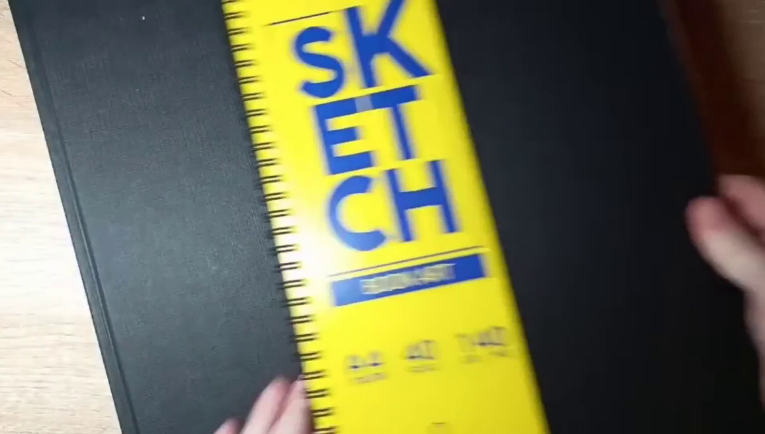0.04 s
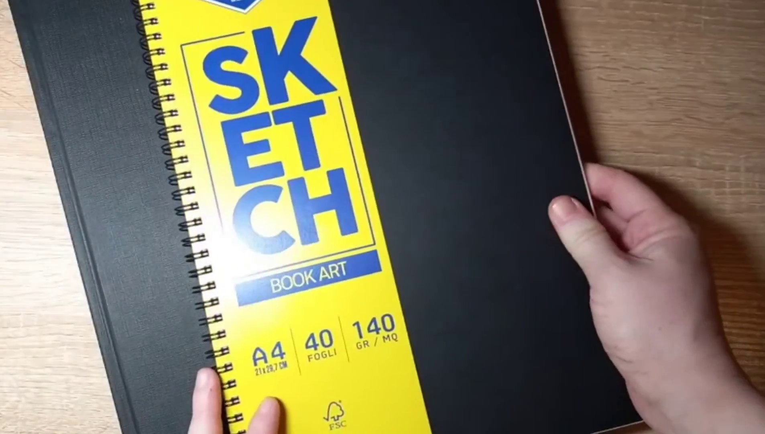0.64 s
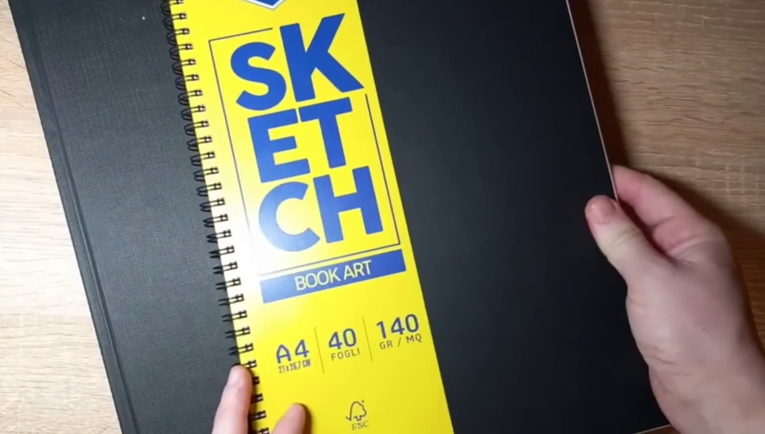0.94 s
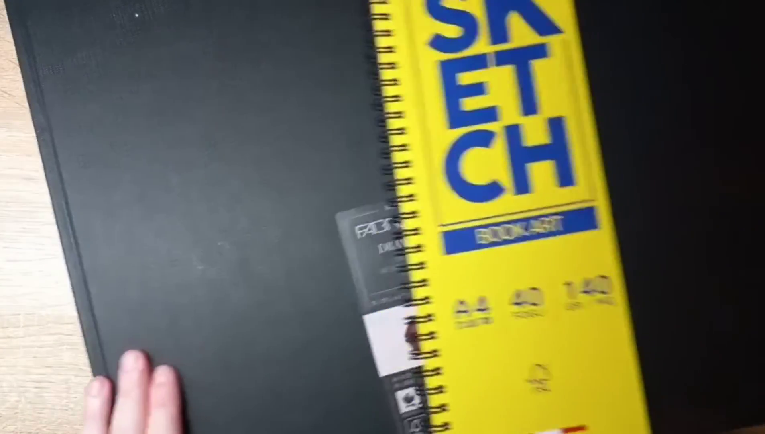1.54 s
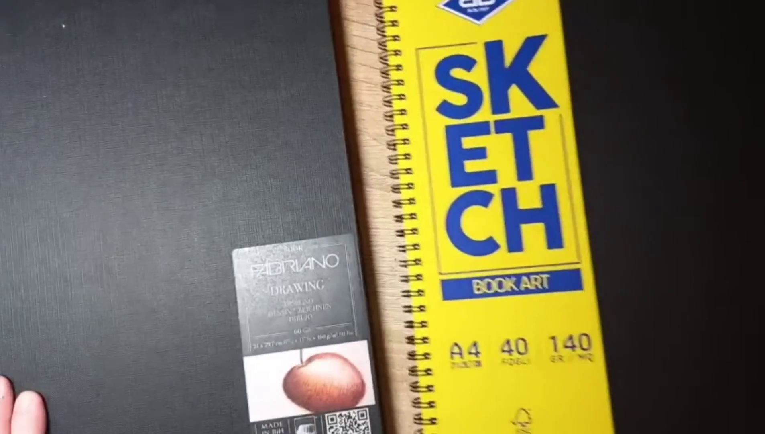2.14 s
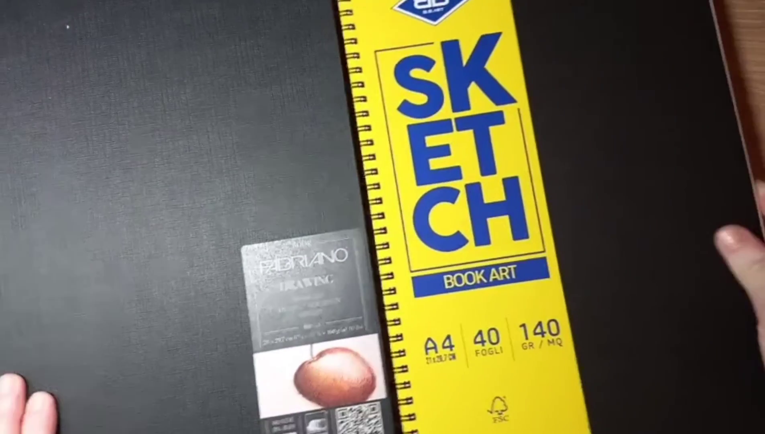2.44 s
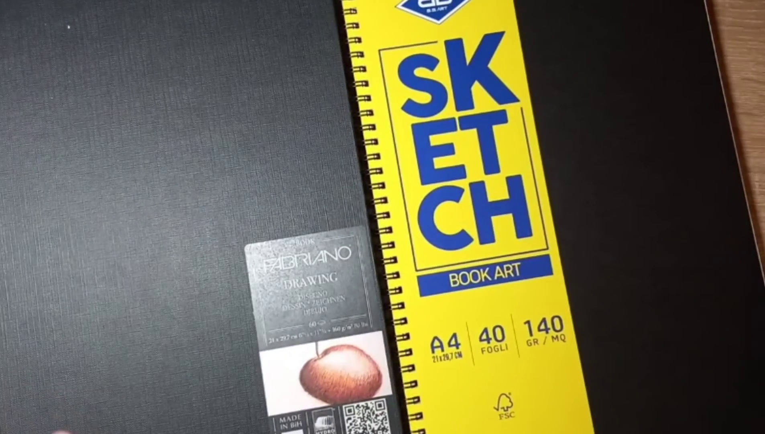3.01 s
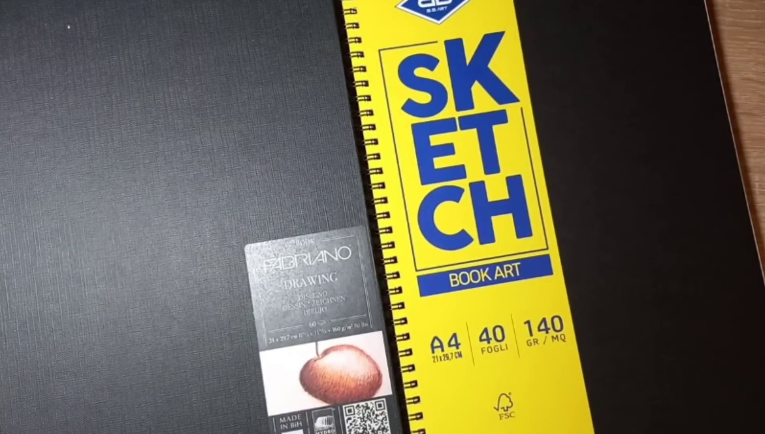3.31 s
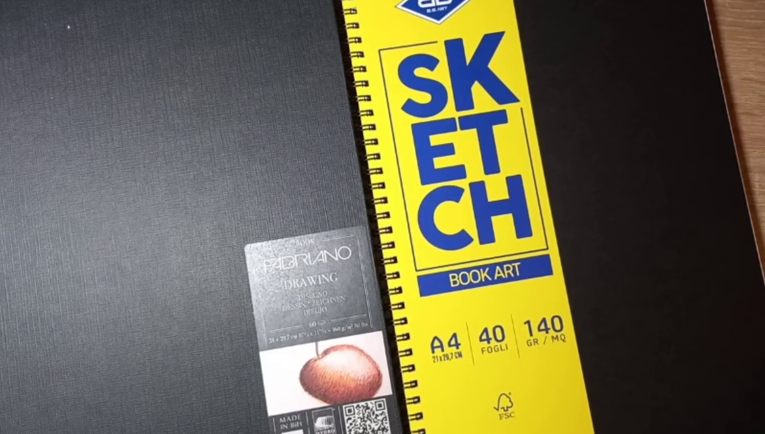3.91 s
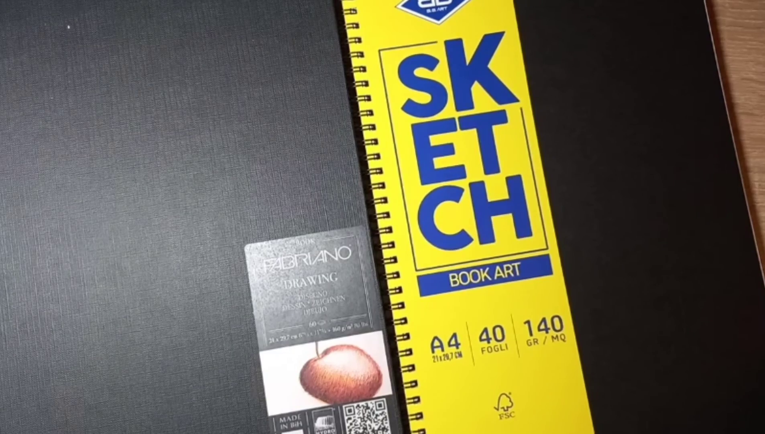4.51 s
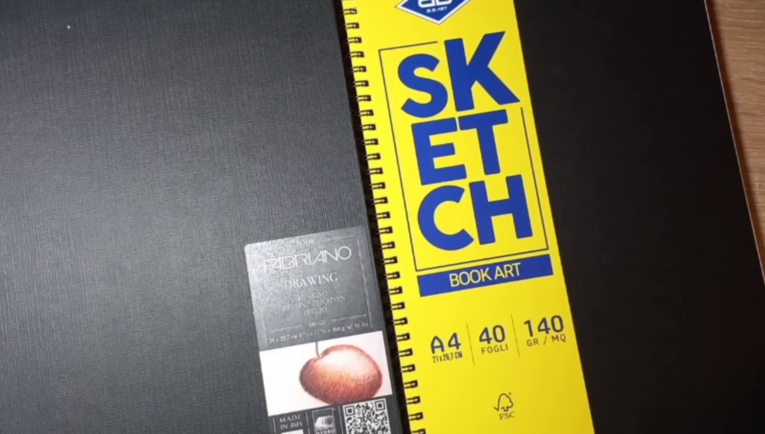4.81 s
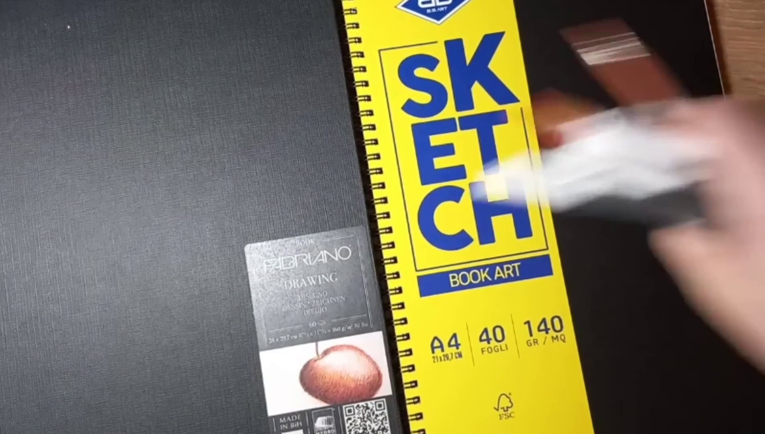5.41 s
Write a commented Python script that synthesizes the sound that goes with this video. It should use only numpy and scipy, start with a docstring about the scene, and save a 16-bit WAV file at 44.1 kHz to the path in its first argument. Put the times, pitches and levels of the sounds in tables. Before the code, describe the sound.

A hardcover sketchbook swishes across another for the first half second. Light taps and soft finger brushes follow until about 1.5 seconds. At 1.6 seconds a book thuds on the wooden table and slides away with a dry hiss. It is eased back with a knock and a tiny click of wire binding around 2.2 seconds, then scrapes over the wood and knocks to a stop near 2.8. Faint brushing and a soft tap lead into a lull, broken by a low knock at 3.8 seconds. From 4 to 4.4 seconds hard drawing tools roll, clack and bounce in a bright clatter, much louder than the books. Small taps follow, then two sharp, rattling drops at about 4.9 and 5.3 seconds, and a last soft brush. A small microphone catches it all with short reverberation and faint room noise.

```python
"""Hardcover sketchbooks are slid apart on a wooden table, patted and pushed together in a small, bare room.
Sliding friction, a stream of tiny slips, hisses on the covers and rumbles in the wood; each knock rings
the boards and the table, and a wire spiral clicks. Then hard drawing tools are rummaged through: they
roll, clack at their own resonances and drop in ever faster, weaker bounces. Short reverberation and
faint room noise surround it all, heard through a small microphone."""
import sys
import numpy as np
from scipy import signal
from scipy.fft import rfft, irfft, next_fast_len
from scipy.io import wavfile
from scipy.ndimage import map_coordinates

SR = 44100
rng = np.random.default_rng(int(sys.argv[2]) if len(sys.argv) > 2 else 0)


def output_pcm(signal):
    """Save a mono or channel-first signal as 16-bit PCM at the path in sys.argv[1].

    Samples are clipped to [-1, 1] before scaling.
    """
    pcm = np.clip(np.atleast_2d(signal).T, -1, 1) * 32767
    wavfile.write(sys.argv[1], SR, np.round(pcm).astype(np.int16))


N = 244742

# Strokes of the books. Each row: time in seconds, relative rumble and hiss levels in dB.
SWEEP = [(0.0, -41, -34.5), (0.096, -43.5, -33), (0.206, -52.5, -45.5), (0.346, -51, -46.5),
         (0.374, -61, -48.5), (0.414, -52, -53.5), (0.47, -89, -79)]  # cover glides over cover
SLIDE = [(1.56, -46, -49), (1.638, -48.5, -53), (1.754, -58.5, -53), (1.792, -50.5, -43.5),
         (1.968, -42.5, -36), (2.082, -43, -36), (2.17, -49, -45.5)]  # the books are drawn apart
NUDGE = [(2.15, -50, -41), (2.2, -49.5, -39.5), (2.255, -55, -39), (2.29, -58, -49.5), (2.34, -55, -58)]  # one is eased back, more slowly
DRAG = [(2.40, -36, -36), (2.454, -38.5, -39.5), (2.506, -36.5, -39), (2.57, -43.5, -43.5),
        (2.642, -39.5, -46.5), (2.704, -49.5, -51), (2.75, -43.5, -37)]  # a book is pushed over the wood
# Their spectra. Each row: frequency in Hz, relative spectral density in dB.
SWEEP_TONE = [(60, -18), (130, -12.5), (300, -5), (480, -7.5), (700, -7.5), (950, 4), (1400, -6.5),
              (1900, -10.5), (2600, -10.5), (3400, -4), (4200, -9.5), (5500, -8.5), (7200, -17.5),
              (8100, -16), (10000, -23)]
SLIDE_TONE = [(60, -21), (100, -13.5), (200, -2.5), (480, -5), (650, -5), (1050, -6), (1500, -7),
              (2400, -6.5), (3400, -9), (4200, -10.5), (6000, -12.5), (7200, -22), (8100, -20),
              (10000, -27.5)]
NUDGE_TONE = [(60, -27), (200, 3), (1100, -4), (1900, -5), (2600, -7.5), (3400, -4.5), (4100, -15.5),
              (8200, -16.5), (10000, -37)]
DRAG_TONE = [(60, -24.5), (90, -6.5), (210, -4.5), (480, -7.5), (800, -0.5), (960, 0), (1170, -12),
             (1450, -11.5), (1750, -6.5), (2100, -5), (2400, -10.5), (2950, -11), (3500, -18), (4600, -17),
             (8000, -30), (10000, -36.5)]

def sliding_books():
    """Sliding friction: smooth covers swish, while wood scrapes more coarsely."""
    sweep = amp(-0.4) * friction(SWEEP, SWEEP_TONE, grit=0.22, judder_db=0.5)
    slide = amp(-1.5) * friction(SLIDE, SLIDE_TONE, grit=0.77, judder_db=0.2)
    nudge = amp(-2.0) * friction(NUDGE, NUDGE_TONE, grit=0.83, judder_db=3.0)
    drag = amp(-2.5) * friction(DRAG, DRAG_TONE, grit=1.0, judder_db=-2.1)
    return sweep + slide + nudge + drag


# Books and hands knock on the table. Each row: start in seconds, relative level in dB, contact time and
# chatter t60 in seconds, board pitch in Hz, level of the settling thud over the knock in dB.
KNOCKS = [ (.511, -34.5, .00045, 0.013, 300, -12), (.681, -37, 0.00049, 0.053, 138, -21),
          (.712, -42, 0.00041, 0.0094, 764, -19), (.951, -38.5, 0.013, .024, 135, -20),
          (1.530, -37, 0.00036, 0.047, 305, -17), (1.628, -27.5, .004, 0.11, 146, -2),
          (2.211, -31.5, 0.00053, 0.015, 133, -27), (2.364, -46.5, 0.0001884, 0.042, 950, -12),
          (2.376, -32, 0.000086, 0.025, 980, -20), (2.774, -32.5, 0.00041, 0.02, 1030, -10),
          (2.780, -35, 0.00022, 0.052, 960, 2.5), (3.108, -41, 0.0012, .05, 430, 0),
          (3.839, -26, 0.0013, 0.087, 115, -19), (4.695, -39.5, 0.0021, 0.04, 232, -14)]
# The wire spiral clicks in its holes. Each row: start in seconds, relative level in dB.
SPIRAL_CLICKS = [(.998, -56), (1.631, -54), (2.210, -44), (4.699, -58.5)]

def knocking_books(settle_s=0.022, settle_hz=108.7, spiral_hz=7300):
    """Impact excitation: a book knocks, then sinks flat with a softer thud; its binding clicks."""
    track = np.zeros(N)
    for start, db, contact_s, chatter_s, board_hz, settle_db in KNOCKS:
        knock(track, start, cushioned(db, contact_s), chatter_s, board_hz)
        settling_db = cushioned(db + settle_db, 2.36 * contact_s)
        knock(track, start + settle_s, settling_db, chatter_s=0.027, ring_hz=settle_hz)
    for start, db in SPIRAL_CLICKS:
        click_db = db + np.array([-13, -11, 10, -6])  # thud, knock, crack, tick
        knock(track, start, click_db, chatter_s=0.0056, ring_hz=spiral_hz)
    return track


def knock(track, start, band_db, chatter_s, ring_hz):
    """Damped resonance: each blow rings the book in one broad mode of its own."""
    mode = (ring_hz, 0.41 * ring_hz, 10.0)
    strike(track, start, band_db, chatter_s, [mode], gain_db=19.5, graze_db=-15.5, wet_db=-3.5)


# A board hit perfectly hard. Entries: relative thud, knock, crack and tick levels in dB.
HARD_BOARD_DB = [-3.5, 1.5, 11, 3.5]

def cushioned(db, contact_s):
    """Contact time acts as a low-pass filter: a longer contact leaves less in the upper bands."""
    loss_db = 20 * np.log10(1 + BAND_EDGES[1:] * BAND_EDGES[:-1] * contact_s ** 2)
    return db + np.array(HARD_BOARD_DB) - (loss_db - loss_db[0])


# Tools tap each other. Each row: start in seconds, relative level and brightness in dB,
# chatter t60 in seconds, ring frequency in Hz.
TAPS = [ (3.813, -47, -12, 0.0048, 1900), (3.993, -33, -19, 0.072, 1780), (4.008, -16.5, -4.5, 0.017, 3630),
        (4.034, -28.5, 17, 0.007, 7260), (4.163, -23, -1, 0.014, 2300), (4.189, -23.5, -3, 0.043, 1660),
        (4.572, -34, -22, 0.008, 2840), (4.744, -44, -18, .05, 2300), (4.86, -45.5, -20, .016, 2156),
        (4.926, -29, -17, 0.035, 1700), (4.944, -23.5, -11, 0.035, 1750)]

def tapping_tools():
    """Hard bodies part quickly, so their collisions are rich in treble."""
    track = np.zeros(N)
    shape_db = np.array([-20, -14, 0.5, -10])  # thud, knock, crack, tick
    for start, db, bright_db, chatter_s, ring_hz in TAPS:
        clack(track, start, db + shape_db, bright_db, chatter_s, ring_hz, ring_db=9)
    return track


# Tools fall on the wood. Each row: start in seconds, relative level and brightness in dB, first chatter
# t60 in seconds, ring frequency in Hz, its lift in dB, first flight in seconds, first loss in dB.
DROPS = [(4.053, -16.5, 3, 0.066, 3750, 3.5, .019, 4), (4.201, -21, 6.5, 0.015, 2450, 9, .021, 10.5),
         (4.333, -15, -3, .04, 6190, 12.5, 0.019, 2.12), (4.948, -13, -7, 0.045, 1780, 0, .009, 4.5),
         (5.266, -13, 2.5, 0.029, 2780, 6.5, .01, 4.5)]

def dropping_tools(flight_ratio=0.9, loss_growth=1.41, bounce_chatter_s=0.16):
    """Inelastic bouncing: each flight is shorter and each landing weaker than the last."""
    track = np.zeros(N)
    shape_db = np.array([-17.5, -17.5, 0.5, -9.5])  # thud, knock, crack, tick
    for start, db, bright_db, first_chatter_s, ring_hz, ring_db, flight_s, loss_db in DROPS:
        for bounce in range(5):
            band_db = db + shape_db - loss_db * bounce ** loss_growth
            chatter_s = bounce_chatter_s if bounce else first_chatter_s
            clack(track, start, band_db, bright_db, chatter_s, ring_hz, ring_db)
            start += flight_s * flight_ratio ** bounce
    return track


# Resonances of the tools. Each row: frequency in Hz, width in Hz, mean lift in dB.
TOOL_MODES = [(1447, 325, 5.7), (1900, 290, 4.5), (2240, 120, 2.2), (2825, 51, 1.7), (3280, 250, 3.4),
              (3898.3, 350, 8), (4530, 860, 5.8), (6420, 1260, 6.3), (8100, 720, 3.8), (9500, 57, 1.4)]
# Spectral tilt. Entries: dB gained by thud, knock, crack and tick per dB of brightness.
TILT = [-0.51, -0.18, -0.027, 1]

def clack(track, start, band_db, bright_db, chatter_s, ring_hz, ring_db, scatter_db=1.8):
    """Modal excitation: each clack favours the modes that suit its point of contact."""
    modes = [(hz, width, db + scatter_db * rng.standard_normal()) for hz, width, db in TOOL_MODES]
    modes.append((ring_hz, 340, ring_db))
    tilted_db = band_db + bright_db * np.array(TILT)
    wet_db = -3.5 * np.exp(-chatter_s / 0.022)  # single taps sound drier than long rattles
    strike(track, start, tilted_db, chatter_s, modes, gain_db=20.5, graze_db=-22.0, wet_db=wet_db)


# Tools roll together. Each row: time in seconds, relative rumble and hiss levels in dB.
RUMMAGE = [(3.99, -39.5, -72), (4.07, -36, -24), (4.14, -37, -35.5), (4.19, -34.5, -30), (4.24, -26, -21.5),
           (4.3, -30, -29.5), (4.39, -41.5, -52), (4.44, -37, -58)]
# Their spectrum. Each row: frequency in Hz, relative spectral density in dB.
RUMMAGE_TONE = [(60, -23), (170, -12), (240, -0.5), (520, -7.5), (1100, -8), (1700, 2.5), (3000, -3.5),
                (4300, -3), (5200, -7), (8000, -13), (10000, -41)]

def rolling_tools():
    """Friction between loose tools: sparser slips give a coarse scrape."""
    return amp(-3.5) * friction(RUMMAGE, RUMMAGE_TONE, grit=0.84, judder_db=0.0, slips_per_s=1500)


# Fingers brush the covers and the table. Each row: start and length in seconds,
# relative peak rumble level in dB, hiss over rumble in dB.
BRUSHES = [(0.701, 0.2, -50.5, 2), (0.863, 0.16, -48.5, -3.5), (1.02, 0.19, -41.5, -4.5),
           (1.195, 0.14, -40.5, -8), (1.389, 0.16, -51, -4), (2.863, .13, -64, 14), (2.979, 0.22, -49, 1),
           (3.851, 0.059, -37.5, -11), (3.921, 0.084, -39, 1.5), (4.558, .11, -43, -8.5),
           (4.679, 0.12, -46.5, -6), (4.83, 0.11, -54, -7), (5.388, 0.13, -42.5, 4)]
# Their spectrum. Each row: frequency in Hz, relative spectral density in dB.
FINGER_TONE = [(60, -27.5), (110, -5.5), (200, -4), (320, 0.5), (520, -8), (800, -2), (1050, -11.5),
               (1800, -19), (2800, -25.5), (7900, -40), (10000, -44.5)]

def brushing_fingers():
    """Friction noise follows speed: each stroke swells and fades as the finger speeds up and slows."""
    swell = [(0, -7.5), (0.54, 0), (1, -16.5)]  # share of the length, dB
    track = np.zeros(N)
    for start, length, rumble_db, hiss_over_db in BRUSHES:
        course = [(start + share * length, rumble_db + db, rumble_db + hiss_over_db + db)
                  for share, db in swell]
        track += friction(course, FINGER_TONE, grit=0.82, judder_db=1.5)
    return amp(-2.5) * track


# Resonances of the table top, rubbed or struck. Each row: frequency in Hz, width in Hz, relative lift in dB.
WOOD_MODES = [(98.6, 25, 8.5), (235.6, 38.5, 9.5), (310, 27, 3.5), (427, 18, 10), (665, 60, 7.5),
              (875, 90, 2.5), (1700, 67, 4.5)]

def friction(course, tone, grit, judder_db, slips_per_s=2500, judder_hz=70, split_hz=1300, fade_s=0.015):
    """Stick-slip friction: tiny slips of uneven size hiss on the surface and rumble in the table."""
    times, rumble_db, hiss_db = np.transpose(course)
    t = np.arange(round((times[0] - fade_s) * SR), round((times[-1] + fade_s) * SR)) / SR
    slips = rng.standard_normal(len(t)) * (rng.random(len(t)) < slips_per_s / SR)
    force = rng.standard_normal(len(t)) + grit * unit(slips)
    grip = rng.standard_normal(int(len(t) * judder_hz / SR) + 4)  # catches and lets go
    judder = amp(judder_db * map_coordinates(grip, [(t - t[0]) * judder_hz]))
    rub = filtered(force, lambda hz: amp(along(tone, hz) + 0.65 * lift(WOOD_MODES, hz)))
    low = filtered(rub, lambda hz: 1 / (1 + (hz / split_hz) ** 10))
    rumble = unit(low * judder) * amp(np.interp(t, times, rumble_db))
    hiss = unit((rub - low) * judder) * amp(np.interp(t, times, hiss_db))
    fade = np.clip(np.minimum(t - t[0], t[-1] - t) / fade_s, 0, 1)
    track = np.zeros(N)
    add(track, t[0], ((rumble + hiss) * fade)[t >= 0])
    return track


def strike(track, start, band_db, chatter_s, modes, gain_db, graze_db, wet_db, lead_s=0.0034):
    """Two-stage impact: an edge grazes, then the full contact lands; both ring body and table."""
    modes = [*WOOD_MODES, *modes]
    hit = np.pad(impact(band_db, modes, chatter_s), (round(lead_s * SR), 0))
    add(hit, 0, amp(graze_db) * impact(band_db, modes, chatter_s=0.018))
    add(track, start - lead_s, amp(gain_db) * reverberate(hit, wet_db))


# The thud, knock, crack and tick bands of an impact. Entries: their limits in Hz.
BAND_EDGES = [60, 400, 1300, 5000, 10000]
BAND_EDGES = np.array(BAND_EDGES)

def impact(band_db, modes, chatter_s, bass_hz=80, flex_hz=350, size=4096):
    """Convolution: a contact and its dying micro-bounces drive the body's impulse response."""
    hz, t = np.fft.rfftfreq(size, 1 / SR), np.arange(size) / SR
    centres_hz = np.sqrt(BAND_EDGES[1:] * BAND_EDGES[:-1])
    density_db = band_db - 10 * np.log10(np.diff(BAND_EDGES) / (SR / 2))
    colour = amp(along(np.c_[centres_hz, density_db], hz) + lift(modes, hz))
    colour *= hz ** 4 / (hz ** 4 + bass_hz ** 4)
    cepstrum = irfft(np.log(colour + 1e-6))  # minimum phase: it rings only after the contact
    cepstrum[1:size // 2] *= 2
    cepstrum[size // 2 + 1:] = 0
    response = irfft(np.exp(rfft(cepstrum)))
    bounces = rng.standard_normal(size) * np.sqrt(rng.exponential(size=size)) * amp(-60 * t / chatter_s)
    force = bounces / np.linalg.norm(bounces)
    force[0] += 0.55 * np.exp(-chatter_s / 0.016)  # a short, clean contact is mostly one tap
    force /= np.linalg.norm(force)
    push = signal.lfilter(*signal.butter(1, flex_hz, fs=SR), t == 0)  # the bass feels a single push
    rattle = signal.lfilter(*signal.butter(1, flex_hz, "high", fs=SR), force)
    return signal.fftconvolve(push + rattle, response)


# Reverberation time of the room. Each row: frequency in Hz, t60 in seconds.
ROOM_T60 = [(100, 0.5), (300, 0.43), (1000, 0.39), (3000, 0.38), (9000, 0.31)]

def reverberate(x, wet_db, build_s=0.0059):
    """Diffuse reverberation: echoes thicken quickly, die first in the treble and vary from spot to spot."""
    hz, t, noise = signal.stft(rng.standard_normal(SR // 2), SR, nperseg=256)
    decay = amp(-60 * t / along(ROOM_T60, hz)[:, None])
    tail = signal.istft(noise * decay, SR, nperseg=256)[1]
    tail *= 1 - np.exp(-(np.arange(len(tail)) / SR / build_s) ** 2)
    response = amp(wet_db) * tail / np.linalg.norm(tail)
    response[0] = 1  # the direct sound
    return signal.fftconvolve(x, response)


# The quiet room. Each row: frequency in Hz, relative spectral density in dB.
AIR_TONE = [(18, -49.5), (30, -47), (79, 4), (200, 1), (367, -3.5), (554, -3.5), (641, -7), (1660, -8),
            (2270, -10.5), (3040, -12), (3780, -14), (4710, -15.5), (10000, -34.5), (13000, -68),
            (22000, -120)]

def room_air():
    """Ambient noise: faint, steady and strongest in the bass."""
    return amp(-56.5) * unit(filtered(rng.standard_normal(N), lambda hz: amp(along(AIR_TONE, hz))))


def amp(db):
    """Decibels as an amplitude ratio."""
    return 10 ** (np.asarray(db) / 20)


def unit(x):
    """A signal scaled to unit RMS."""
    return x / np.sqrt(np.mean(x ** 2) + 1e-20)


def along(points, hz):
    """Interpolation of (Hz, value) points on a log frequency axis."""
    frequencies, values = np.transpose(points)
    return np.interp(np.log(hz + 1), np.log(frequencies + 1), values)


def filtered(x, response):
    """Filtering multiplies a spectrum by a frequency response."""
    size = next_fast_len(len(x) + SR // 4)
    return irfft(rfft(x, size) * response(np.fft.rfftfreq(size, 1 / SR)), size)[:len(x)]


def lift(modes, hz):
    """Each resonance adds a bell-shaped peak in dB."""
    return sum(db / (1 + (2 * (hz - centre) / width) ** 2) for centre, width, db in modes)


def add(track, start, sound):
    """Mix a sound in at a start time in seconds."""
    part = track[max(round(start * SR), 0):][:len(sound)]
    part += sound[:len(part)]


def scene():
    """Superposition: rubbing and impacts add, with their echoes, over the air of the room."""
    rubbing = reverberate(sliding_books() + brushing_fingers() + rolling_tools(), wet_db=-7.5)[:N]
    return (rubbing + knocking_books() + tapping_tools() + dropping_tools() + room_air())[None]


# Treble colour of the microphone. Each row: frequency in Hz, width in Hz, lift in dB.
MICROPHONE_MODES = [(7450, 500, -1.5), (7960, 660, 5)]
# A steep treble cut. Each row: frequency in Hz, gain in dB.
TREBLE_CUT = [(9300, 0), (9750, -3), (10100, -9), (10380, -21), (10700, -42), (11300, -52), (12000, -36),
              (12400, -44), (12800, -90)]

def record(dry, bass_hz=35, top_hz=12500, ceiling=0.9):
    """Band limiting and saturation: a small microphone colours the treble and rounds the highest peaks."""
    def response(hz):
        passband = hz ** 2 / (hz ** 2 + bass_hz ** 2) / np.sqrt(1 + (hz / top_hz) ** 20)
        return amp(lift(MICROPHONE_MODES, hz)) * passband

    heard = filtered(dry[0], response)
    rounded = heard / (1 + (heard / ceiling) ** 8) ** (1 / 8)
    return filtered(rounded, lambda hz: amp(along(TREBLE_CUT, hz)))[None]


dry = scene()
out = record(dry)
output_pcm(out)
```